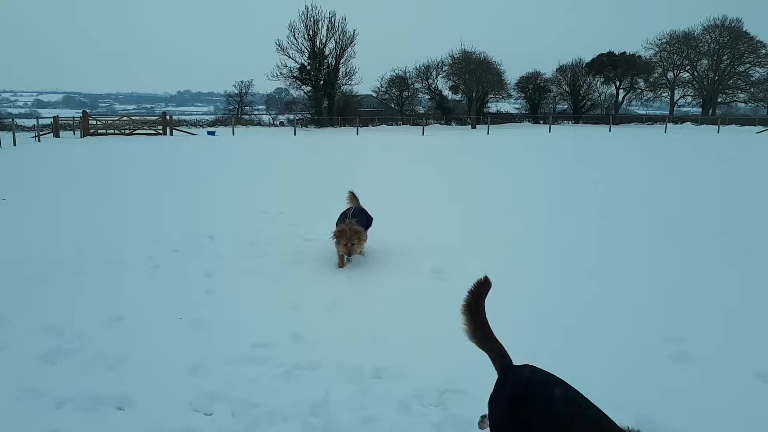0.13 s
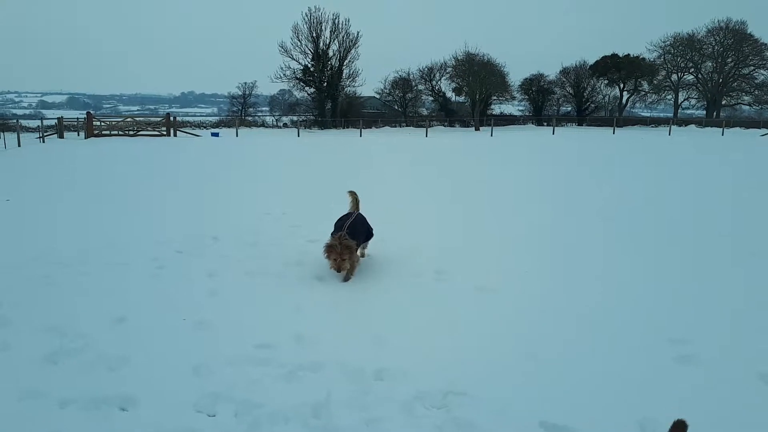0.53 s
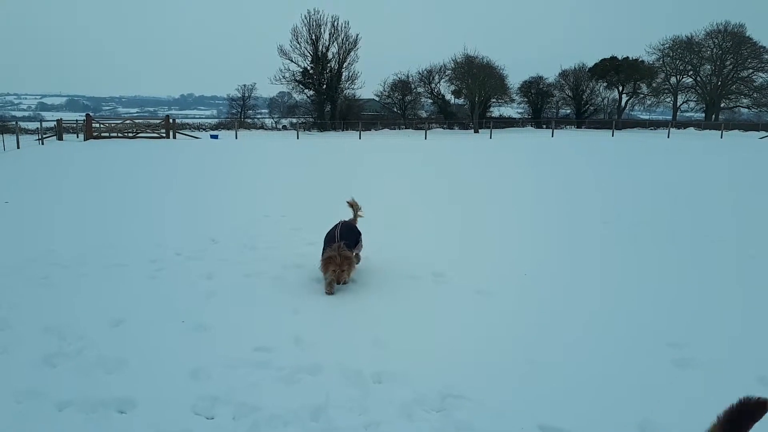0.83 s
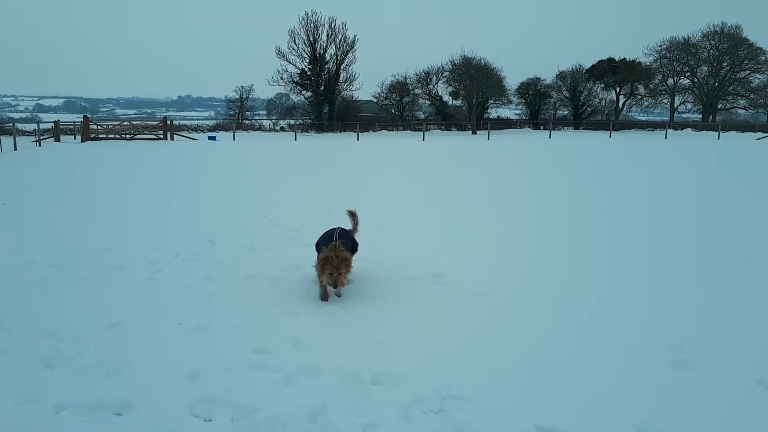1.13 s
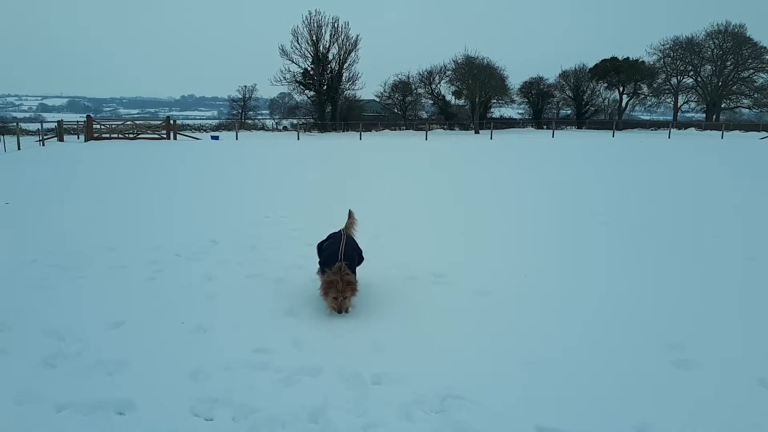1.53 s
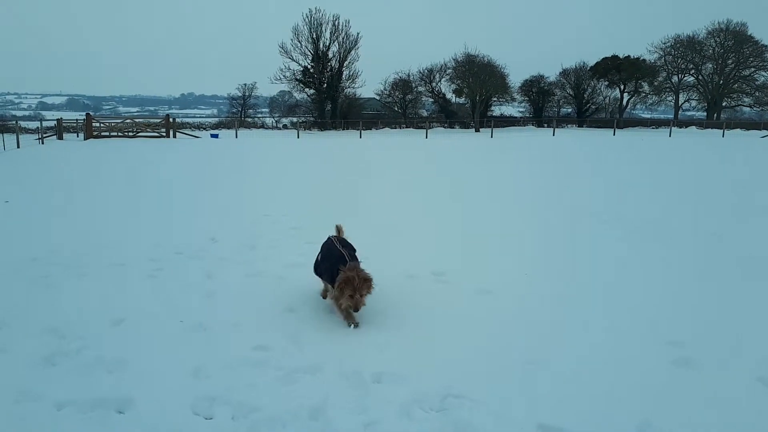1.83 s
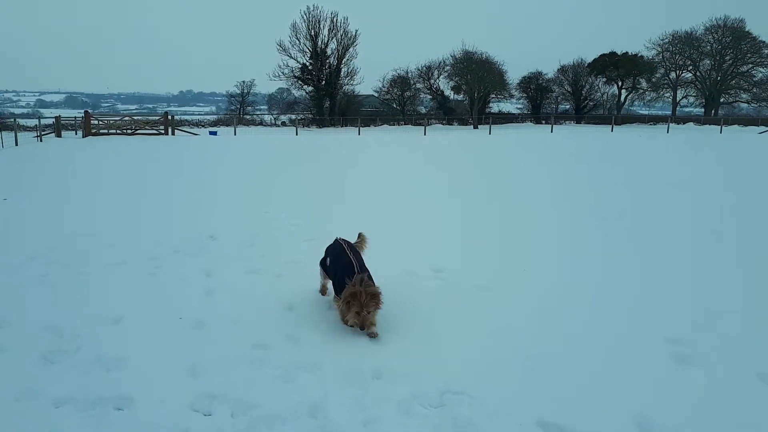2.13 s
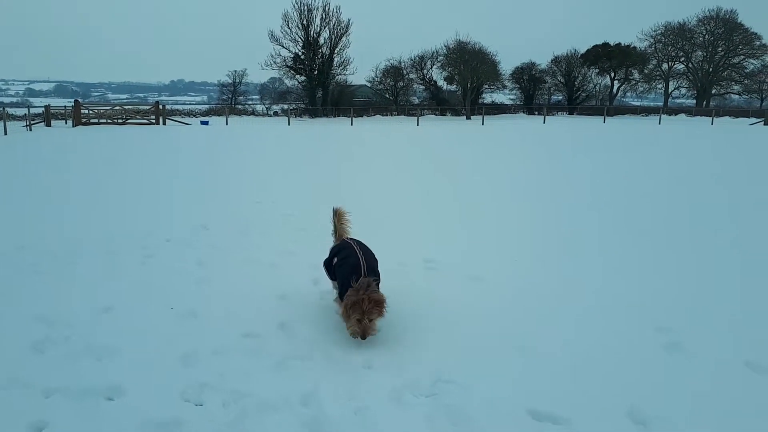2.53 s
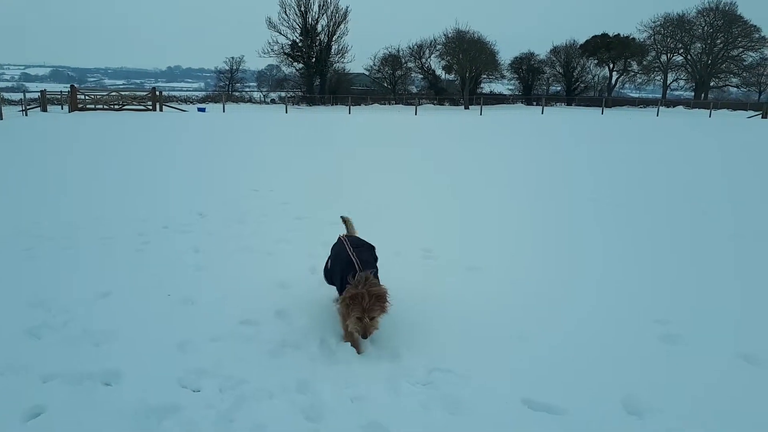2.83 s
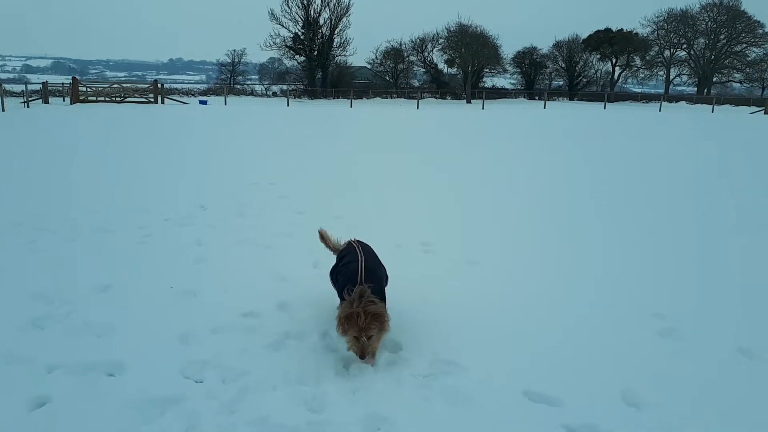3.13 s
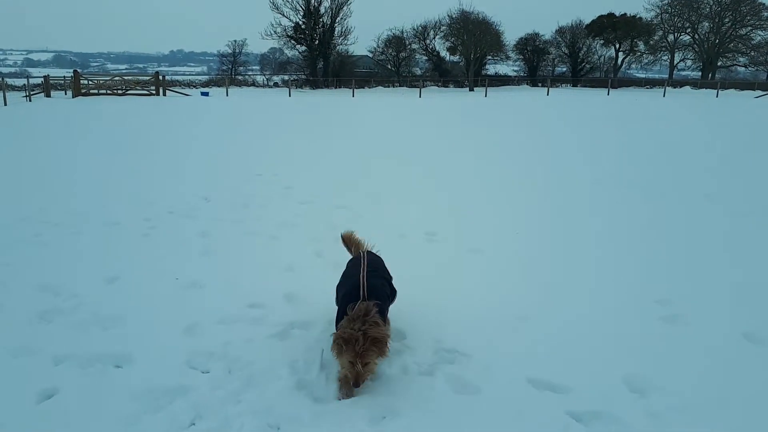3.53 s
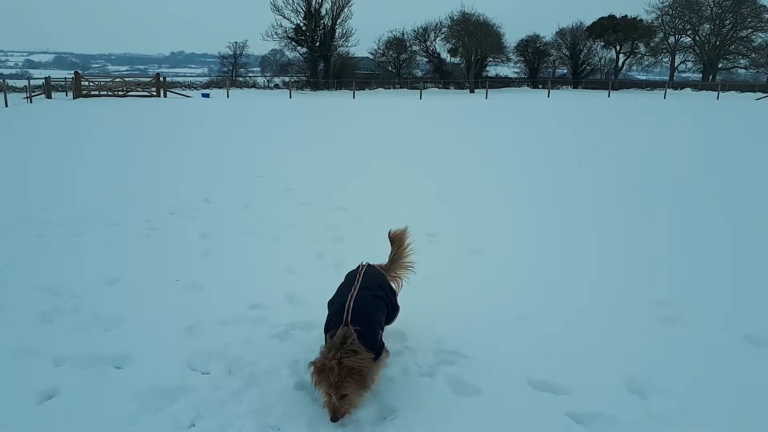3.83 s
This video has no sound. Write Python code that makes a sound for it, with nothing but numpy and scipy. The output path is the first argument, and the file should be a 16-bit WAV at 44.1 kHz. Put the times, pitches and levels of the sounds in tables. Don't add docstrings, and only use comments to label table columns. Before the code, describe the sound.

Dog paws crunch through crusty snow close to the microphone, with dull thuds and sharp ice snaps; later, softer steps farther off are partly covered by strong wind buffets in an open field.

```python
import sys
import numpy as np
from scipy import signal
from scipy.fft import rfft, irfft
from scipy.io import wavfile
from scipy.ndimage import uniform_filter1d, minimum_filter1d

SR = 44100
rng = np.random.default_rng(int(sys.argv[2]) if len(sys.argv) > 2 else 0)


def field_ratio(decibels):
    return 10 ** (np.asarray(decibels, dtype=float) / 20)


def wav_record(signal):
    frames = np.transpose(np.atleast_2d(signal))
    bounded = np.clip(frames, -1, 1)
    quanta = np.round(bounded * 32767).astype(np.int16)
    wavfile.write(sys.argv[1], SR, quanta)


N = 176400

HZ = np.arange(N // 2 + 1) * SR / N + 1e-3
FAR_FROM_S = 2.4

# [t/s, length/s, grain level/dB, thud
# level/dB, coarse over fine grains/dB]
NEAR_PAWS = [(.02, 0.052, -46.5, -80, -25), (.076, 0.038, -33, -34, -12.5),
             (.135, 0.022, -37.5, -38, -35.5), (.272, 0.057, -53, -71, -10),
             (.368, 0.093, -31.5, -36.5, -4.5), (.478, 0.16, -46.5, -46.5, -34),
             (.714, 0.021, -41.5, -29, 7), (.762, 0.057, -40, -50, 5.5), (.82, 0.015, -40.5, -31, 3),
             (.845, 0.056, -42, -41, -2), (.93, 0.062, -46.5, -42, 3.5), (1.1, 0.087, -41.5, -64.5, -8),
             (1.2, .12, -47, -45.5, 4.5), (1.33, 0.082, -52, -46, 5), (1.47, 0.043, -55.5, -49.5, 10),
             (1.59, 0.008, -36.5, -29, 9.5), (1.63, 0.036, -42.5, -41, 6), (1.72, 0.04, -40.5, -37, 2.5),
             (1.79, 0.068, -43.5, -79, 5.5), (1.91, 0.095, -52.5, -78, -1), (2.0, 0.092, -44, -41, -1),
             (2.155, 0.095, -49.5, -49.5, -3.5), (2.3, 0.12, -72, -62, 12), (2.47, 0.14, -84, -39.5, 0)]
FAR_PAWS = [
    (2.641, 0.087, -56.5, -40.5, 4),
    (2.751, 0.054, -48.5, -56, -7.5),
    (2.854, 0.074, -50, -42, -3),
    (3.049, 0.2, -56, -56, 1),
    (3.298, 0.16, -49.5, -82, -11),
    (3.951, 0.044, -48.5, -40.5, -6),
]


def paw_steps():
    s, length, grain_db, thud_db, coarse_db = np.transpose([*NEAR_PAWS, *FAR_PAWS])
    near = s < FAR_FROM_S
    far_rise_s, lift_s = 0.015, 0.016
    fine_push = bursts(s, length, grain_db, np.where(near, 0.002, far_rise_s), lift_s, sag_db=4)
    coarse_push = bursts(s, length, grain_db + coarse_db, 0.016, lift_s, sag_db=4.1)
    thud_push = bursts(s, length, thud_db, np.where(near, 0.0027, far_rise_s), 0.0061, sag_db=1.0)
    main, other = crushed_crust(fine_push, coarse_push)
    return np.array([main + paw_thuds(thud_push), other])


# [f/Hz, level/dB per Hz]
FINE_GRAINS = [(240, 4.5), (450, -1), (1460, -1), (1730, -10), (2840, -17), (5000, -6.5), (5800, -10),
               (7400, -4), (8630, -16), (16000, -16)]
# [f/Hz, level/dB per Hz]
COARSE_GRAINS = [(300, 5.5), (900, 4.5), (1700, 5), (2500, 5), (3200, 4), (4600, -6), (8000, -49.5)]


def crushed_crust(fine_push, coarse_push):
    clumps_per_s = 110
    clumps = field_ratio(2.4 * np.clip(drift(clumps_per_s), -2, 2))
    takes = np.zeros((2, N))
    for push, spectrum in [(fine_push, FINE_GRAINS), (coarse_push, COARSE_GRAINS)]:
        own_clumps = field_ratio(4.5 * np.clip(drift(clumps_per_s / 2), -2, 2))
        for take in takes:
            crumble = np.zeros(N)
            for hz, band in bands(spectrum, grains()):
                if hz > 200:
                    crumble += np.roll(band * own_clumps, int(7 * hz))
            take += push * evened(rms_one(clumps * crumble), 0.02, 0.8)
    return takes


def grains():
    grains_per_s, spread_db = 2600, 4.0
    sizes = field_ratio(spread_db * np.minimum(rng.exponential(1, N), 5)) * rng.choice([-1, 1], N)
    return sizes * (rng.random(N) < grains_per_s / SR)


# [f/Hz, level/dB per Hz]
THUD_COLOUR = [(40, -58.5), (80, -3), (130, 3), (220, -12), (400, -7.5), (800, -15.5), (1500, -37.5)]


def paw_thuds(push):
    return push * evened(colour(THUD_COLOUR, rng.standard_normal(N)), 0.012, 0.97)


# [t/s, peak level/dB, ring f/Hz, dull share level/dB]
NEAR_SNAPS = [(0.0261, -29, 6460, -11), (0.0437, -36, 6830, -6), (0.085, -10, 8000, -2),
              (0.1208, -23, 4680, 4), (0.1395, -20, 7700, 4), (0.2256, -34.5, 7420, 0),
              (0.2736, -37, 2260, 8), (0.2782, -32, 6200, 9), (0.3141, -23.5, 7400, -6),
              (0.347, -30, 7500, -6), (0.3706, -25, 2920, 13), (0.4108, -23, 4800, 8),
              (0.4846, -18.5, 6930, -3), (0.5217, -21.5, 7500, 4), (0.594, -31, 7000, -14),
              (0.7142, -23, 3130, 3.5), (0.7486, -26, 3340, -23), (0.7732, -23, 3200, -18),
              (0.7947, -18, 3030, -15), (0.8044, -21, 3170, 1), (0.8214, -22, 3020, -12),
              (0.8589, -27.5, 2920, -3), (0.9501, -27.5, 6700, -2), (1.0284, -43, 2970, 25.5),
              (1.0507, -32, 6300, 7), (1.1134, -48, 5390, 17.5), (1.1174, -30, 7600, 3),
              (1.1251, -20.5, 5600, 10), (1.1499, -31.5, 6750, 17.5), (1.2025, -36.5, 3800, 16.5),
              (1.2574, -29.5, 6760, -6), (1.27, -27, 3740, 10), (1.3008, -25, 6900, -10),
              (1.314, -29, 7200, -9), (1.3999, -31.5, 2660, 0), (1.5973, -30.5, 3200, -1),
              (1.6443, -38, 3570, -8), (1.7475, -25, 2780, 3), (1.7818, -21.5, 2610, -15),
              (1.7928, -24, 3300, -19), (1.8164, -27, 3340, -16), (1.8298, -21.5, 3530, -14),
              (1.8419, -30, 3790, 6), (1.859, -26, 6630, -9), (1.867, -33, 4600, -9),
              (1.9175, -36.5, 6900, -6), (1.9246, -36, 3260, -9), (1.9408, -27, 7400, -19),
              (1.977, -32, 3680, -11), (1.9881, -25.5, 7240, -14)]
# [t/s, peak level/dB, ring f/Hz]
LATER_SNAPS = [(1.9985, -27.5, 3730), (2.0054, -19, 7440), (2.026, -29.5, 3850), (2.045, -24.5, 7040),
               (2.169, -27, 6860), (2.2932, -38, 7190), (2.3136, -41, 7040), (2.3265, -35.5, 6750),
               (2.3724, -25.5, 3500), (2.4418, -34, 7420), (2.4957, -43, 7390), (2.5144, -31, 7110),
               (2.6268, -35.5, 6930), (2.6901, -36.5, 3900), (2.7521, -22.5, 7830), (2.7534, -23, 6120),
               (2.7834, -29, 3820), (2.8639, -32, 7140), (3.0717, -19, 7380), (3.1643, -37, 3860),
               (3.238, -32, 7430), (3.268, -40, 7110), (3.3057, -36.5, 7410), (3.3185, -43, 7180),
               (3.3954, -36, 7430), (3.4394, -33, 3890), (3.5202, -40, 3790), (3.539, -36, 6720),
               (3.6086, -42, 4460), (3.7207, -40.5, 7390), (3.7977, -48, 7000), (3.866, -61, 4000),
               (3.8755, -38.5, 4260), (3.9145, -38, 3530), (3.9449, -44, 4000), (3.961, -38, 7180)]
# [f/Hz, level/dB]
SNAP_TREBLE = [(7600, -3.5), (8700, -13), (16000, 2)]


def ice_snaps():
    t60_s, ring_width, later_dull_db = 0.0105, 0.23, -29
    plates = [*NEAR_SNAPS, *[(*row, later_dull_db) for row in LATER_SNAPS]]
    u = np.arange(2048) / SR
    out = np.zeros((2, N + len(u)))
    broad_filter = signal.butter(2, 1900, "high", fs=SR)
    dull_filter = signal.butter(1, [870 / 2, 870 * 1.9], "band", fs=SR)
    for s, peak_db, hz, dull_db in plates:
        crack = rng.standard_normal((2, len(u))) * np.exp(-u * np.log(1000) / t60_s)
        ring_edges = [hz * (1 - ring_width / 2), hz * (1 + ring_width / 2)]
        ring_filter = signal.butter(1, ring_edges, "band", fs=SR)
        start = int(s * SR)
        for shape, share_db in [(ring_filter, 0), (broad_filter, -4), (dull_filter, dull_db)]:
            part = signal.lfilter(*shape, crack)
            part = part / np.abs(part).max(axis=1, keepdims=True)
            out[:, start:start + len(u)] += field_ratio(peak_db - 1.5 + share_db) * part
    return filtered(out[:, :N], SNAP_TREBLE)


# [f/Hz, level/dB]
SCATTER = [(300, -24.5), (2000, -3), (4500, 2), (9000, 3)]


def ports(main, other):
    port_lag_s, turn_s, right_db = 0.000286, 1.96, 1.1
    seconds = np.arange(N) / SR
    far = filtered([main, other], [(7800, 0), (9500, -6)])
    main, other = np.where(seconds < FAR_FROM_S, [main, other], far)
    late = irfft(rfft(main) * np.exp(-2j * np.pi * HZ * port_lag_s), N)
    turned = np.clip((seconds - turn_s) / 0.02, 0, 1)
    scatter = rfft(other) * curve(SCATTER)
    left = late + turned * (main - late) + irfft(scatter, N)
    right = main + irfft(1j * scatter, N)
    return np.array([left, right * field_ratio(right_db)]) * field_ratio(-3)


# [t/s, length/s, level/dB]
LEFT_WIND = [(2.78, 0.035, -21.5), (2.796, 0.014, -16), (2.82, 0.16, -26), (2.927, 0.024, -6),
             (2.959, 0.013, -9.5), (2.972, 0.016, -4.5), (2.997, 0.0073, 0.5), (3.031, 0.013, -0.5),
             (3.061, 0.013, -11), (3.082, 0.021, -6.5), (3.11, 0.16, -19.5), (3.285, 0.04, -14.5),
             (3.342, 0.016, -10.5), (3.37, 0.086, -20), (3.42, 0.12, -19), (3.52, 0.098, -22.5),
             (3.585, 0.18, -22.5), (3.685, 0.035, -18), (3.745, 0.044, -20), (3.8, 0.027, -15),
             (3.832, 0.028, -8), (3.852, 0.0032, -1.5), (3.866, 0.022, -7), (3.884, 0.027, -7),
             (3.912, 0.014, -9), (3.93, 0.016, -7.5), (3.95, 0.064, -24)]
# [t/s, length/s, level/dB]
RIGHT_WIND = [(2.89, 0.089, -24), (2.955, 0.042, -17.5), (3.06, 0.013, -31.5), (3.125, 0.0066, -15),
              (3.17, 0.12, -18), (3.23, 0.039, -11), (3.275, 0.026, -10), (3.32, 0.085, -12),
              (3.42, 0.13, -22.5), (3.59, 0.018, -14), (3.63, 0.055, -32), (3.7, 0.084, -25.5),
              (3.8, 0.053, -34.5), (3.94, 0.083, -36)]
# [f/Hz, level/dB per Hz]
FULL_GUST = [(18, -47), (30, -27), (102, -3), (287, -8), (352, -8.5), (400, -8.5), (887, -21), (2500, -51),
             (3250, -53), (5500, -120)]


def wind_gusts():
    return np.array([buffet(LEFT_WIND), buffet(RIGHT_WIND)])


def buffet(gusts):
    full_gust_db, dulling_per_octave, knee_hz = -3.5, 0.65, 183
    s, length, db = np.transpose(gusts)
    push = bursts(s, length, db, 0.0028, 0.0092, sag_db=1.0)
    lumps_db = 2.24 * np.clip(drift(45), -2, 2)
    strength = push * field_ratio(lumps_db - full_gust_db)
    flow = np.zeros(N)
    for hz, band in bands(FULL_GUST, rng.standard_normal(N)):
        if hz < 3000:
            dulling = dulling_per_octave * max(np.log2(hz / knee_hz), 0)
            flow += evened(band, 0.016, 0.48) * band.std() * strength ** dulling
    return signal.sosfilt(signal.butter(2, 1550, fs=SR, output="sos"), push * flow)


# [f/Hz, level/dB per Hz]
FIELD_AIR = [(24, -41), (40, 2.5), (467, 14.5), (1680, -10.5), (3740, -22), (5440, -27), (7170, -21),
             (8770, -33.5), (16000, -34.5)]


def field_air():
    patches = drift(19.0)
    takes = np.zeros((2, N))
    for take in takes:
        for hz, band in bands(FIELD_AIR, rng.standard_normal(N)):
            take += band * field_ratio(3.0 * np.roll(patches, int(9 * hz)))
    return field_ratio(-49) * rms_one(ports(takes[0], field_ratio(19.0) * takes[1]))


def ducked(field, wind):
    duck_above_db, recover_db_per_s = -12, 6
    level_db = 10 * np.log10(uniform_filter1d((wind ** 2).max(axis=0), size=800) + 1e-12)
    ramp = recover_db_per_s * np.arange(N) / SR
    held_db = np.maximum.accumulate(level_db + ramp) - ramp
    over_db = np.maximum(held_db - duck_above_db, 0)
    hiss = irfft(rfft(field) * (HZ > 7800), N)
    return (field - hiss) * field_ratio(-0.13 * over_db) + hiss * field_ratio(-0.2 * over_db)


def bursts(s, length, db, rises, fall, sag_db):
    power = np.zeros(N)
    for at, hold, level_db, rise in zip(s, length, db, rises + 0 * s):
        start = int(at * SR)
        u = np.arange(min(N - start, SR // 2)) / SR
        up = np.sin(np.pi / 2 * np.clip(u / rise, 0, 1)) ** 2
        sag = field_ratio(level_db - sag_db * np.clip(u / hold, 0, 1))
        down = np.exp(-np.maximum(u - hold, 0) / fall)
        power[start:start + len(u)] += (sag * up * down) ** 2
    return np.sqrt(power)


def drift(rate_hz):
    r = np.exp(-2 * np.pi * rate_hz / SR)
    return rms_one(signal.lfilter([1], [1, -2 * r, r * r], rng.standard_normal(N + SR))[SR:])


def bands(spectrum, source):
    whole = rfft(colour(spectrum, source))
    place = 2 * np.log2(np.clip(HZ, 40, 16000) / 40)
    for k in range(19):
        overlap = np.clip(1 - np.abs(place - k), 0, 1)
        yield 40 * 2 ** (k / 2), irfft(whole * overlap, N)


def colour(spectrum, source):
    return rms_one(filtered(source, spectrum))


def filtered(x, spectrum):
    return irfft(rfft(x) * curve(spectrum), N)


def curve(spectrum):
    hz, db = np.transpose(spectrum)
    return field_ratio(np.interp(np.log(HZ), np.log(hz), db))


def evened(x, seconds, share):
    return rms_one(x / uniform_filter1d(x ** 2, size=int(seconds * SR)) ** (share / 2))


def rms_one(x):
    return x / np.sqrt(np.mean(x ** 2) + 1e-20)


def scene():
    dogs = ports(*(paw_steps() + ice_snaps()))
    wind = wind_gusts()
    return dogs + wind + ducked(field_air(), wind)


# [f/Hz, level/dB]
MIC_RESPONSE = [(25, -24), (55, 0), (15800, 0), (16150, -40)]


def microphones(x):
    return filtered(x, MIC_RESPONSE)


def low_pass(x):
    return signal.sosfilt(signal.butter(12, 16980, fs=SR, output="sos"), x)


def record(dry):
    heard = microphones(dry)
    span = int(0.003 * SR)
    gain = minimum_filter1d(np.minimum(1, 0.99 / (np.abs(heard) + 1e-9)), size=2 * span)
    mix = heard * uniform_filter1d(gain, size=span)
    return low_pass(mix)


dry = scene()
out = record(dry)
wav_record(out)
```